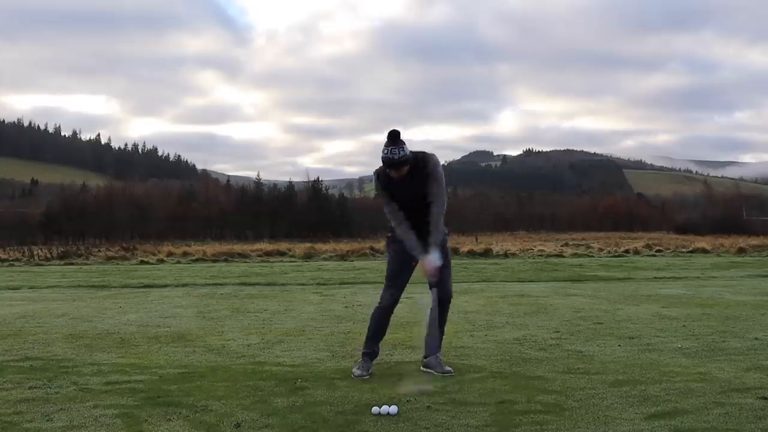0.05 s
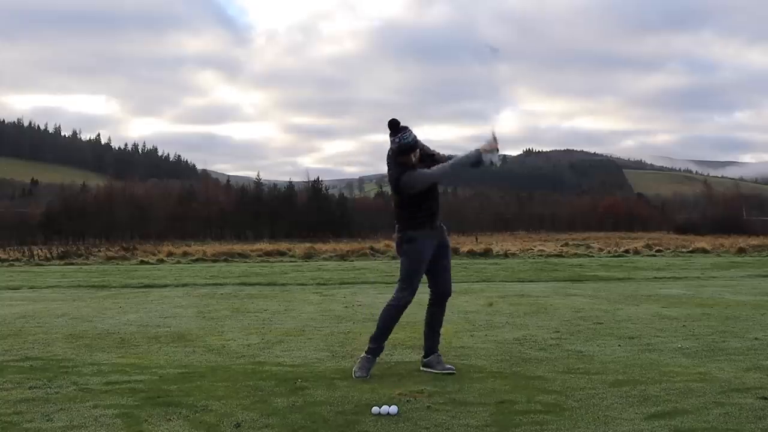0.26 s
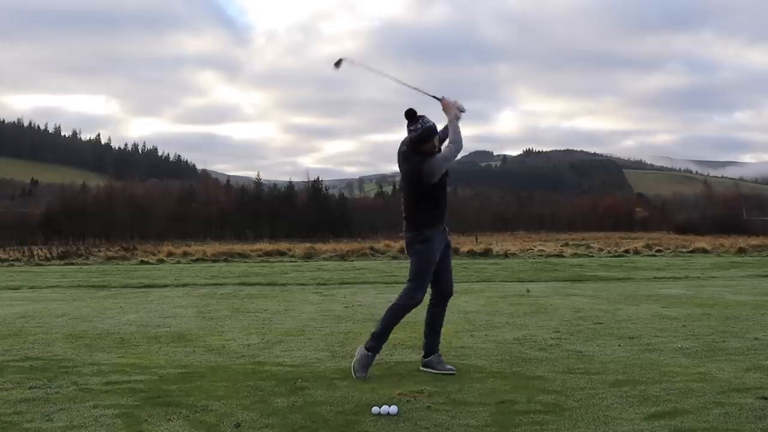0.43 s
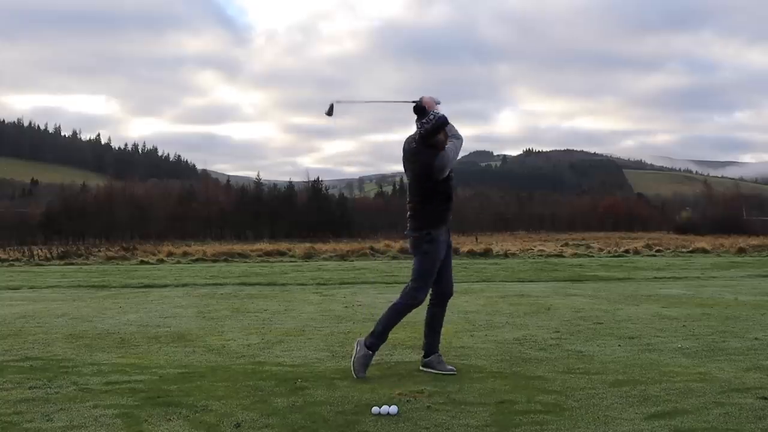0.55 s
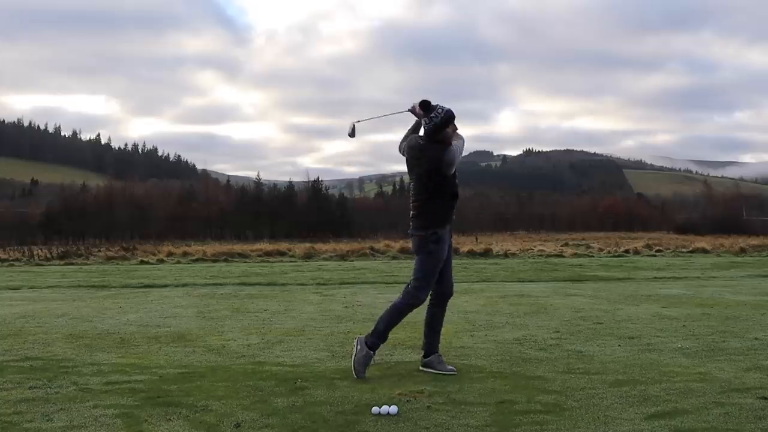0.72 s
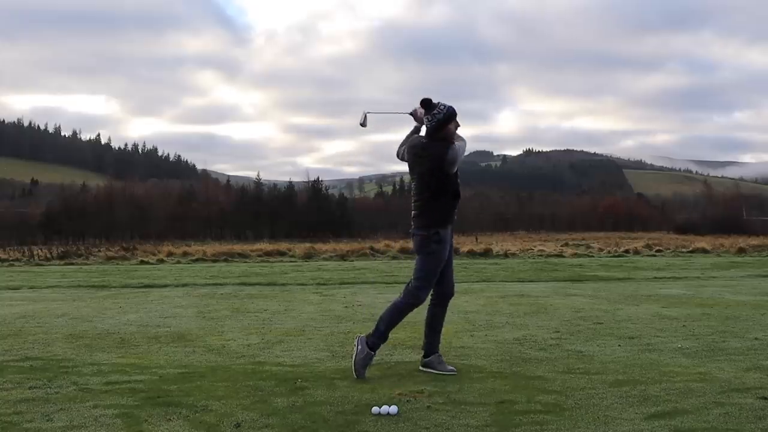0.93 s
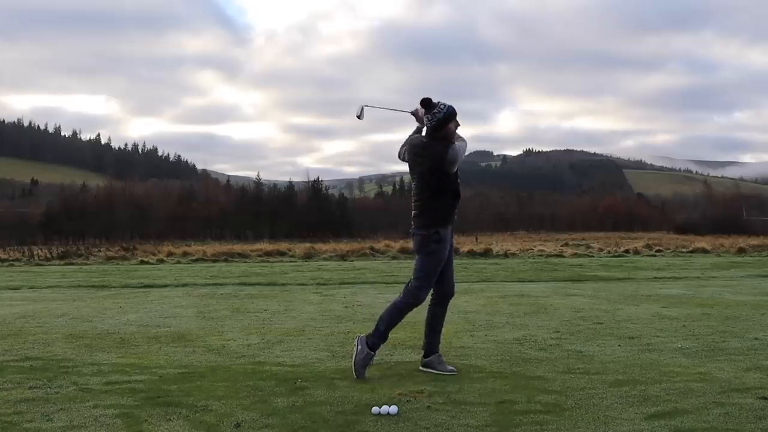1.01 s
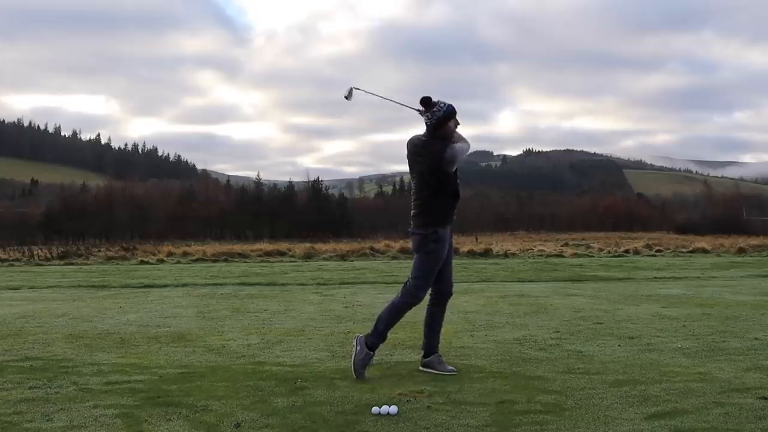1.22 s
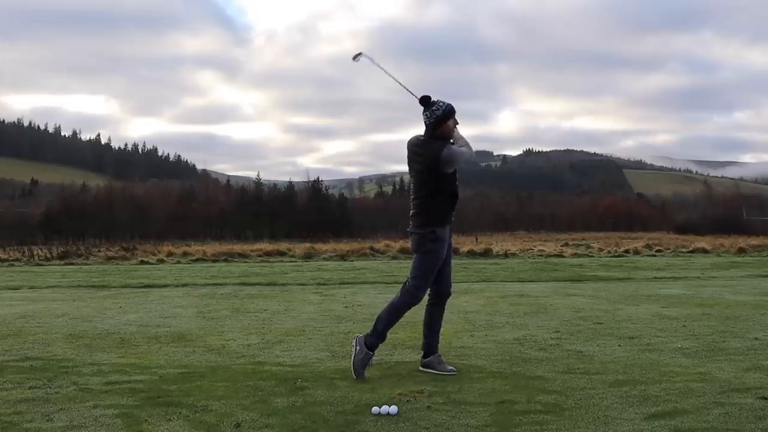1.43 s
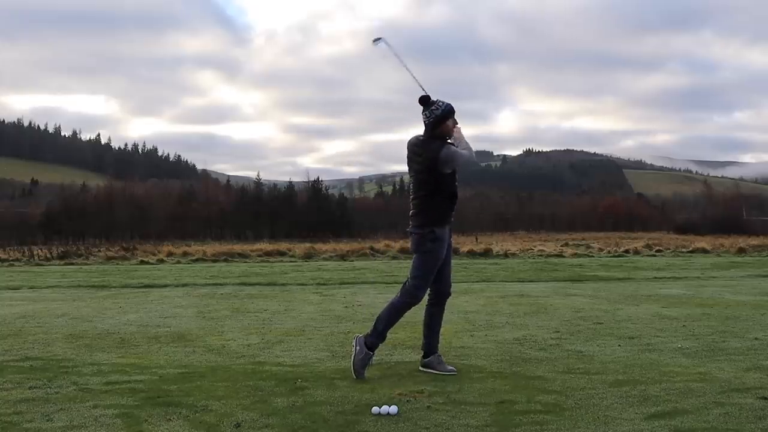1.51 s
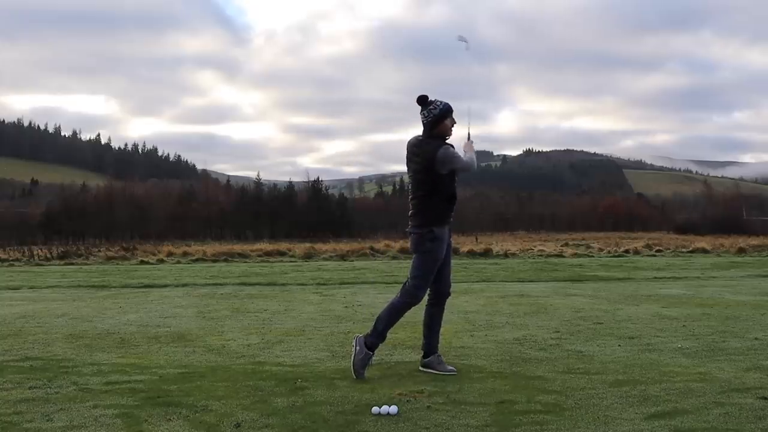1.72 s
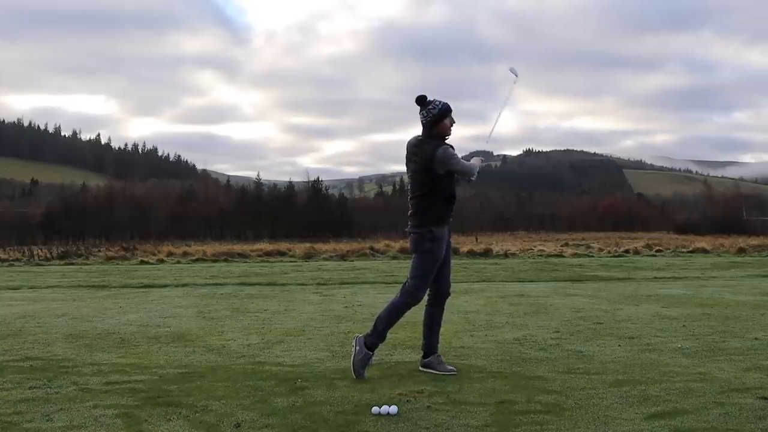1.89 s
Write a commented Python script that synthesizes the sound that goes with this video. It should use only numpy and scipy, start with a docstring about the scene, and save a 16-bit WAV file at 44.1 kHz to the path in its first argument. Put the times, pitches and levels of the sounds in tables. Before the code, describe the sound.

An iron strikes a golf ball with one sharp crack after a quick swish.

```python
"""A swish rises as an iron swings down, its shaft shedding eddies, on an open grass range.
The head strikes a golf ball with a crack and a brief ring, overloading the microphone.
It cuts on through the turf and throws up crumbs of soil; the spinning ball fizzes away.
Clothes rustle with the swing, then faintly as the club is lowered, over a far-off roar like a road."""
import sys
import numpy as np
from scipy import signal
from scipy.fft import rfft, irfft
from scipy.io import wavfile
from scipy.ndimage import uniform_filter1d

SR = 44100
rng = np.random.default_rng(int(sys.argv[2]) if len(sys.argv) > 2 else 0)


def bounce(signal):
    """Save signal as a 16-bit WAV file at the path given by the first command-line argument."""
    frames = np.transpose(np.atleast_2d(signal))
    limited = np.clip(frames, -1, 1)
    pcm = np.round(limited * 32767).astype(np.int16)
    wavfile.write(sys.argv[1], SR, pcm)


N = 85995
T = np.arange(N) / SR


def amp(db):
    """dB to gain."""
    return 10 ** (np.asarray(db) / 20)


def unit(x):
    """Scale to rms 1."""
    return x / np.sqrt(np.mean(x ** 2) + 1e-20)


def curve(rows, column=1):
    """One column of a timed table, interpolated per sample."""
    rows = np.array(rows)
    return np.interp(T, rows[:, 0], rows[:, column])


def noise(spectrum):
    """Noise of rms 1, shaped by rows of f/Hz, relative density/dB."""
    hz, db = np.transpose(spectrum)
    bins_hz = np.fft.rfftfreq(N, 1 / SR)
    gain = amp(np.interp(np.log(bins_hz + 1), np.log(hz), db))
    return unit(irfft(rfft(rng.standard_normal(N)) * gain, N))


def burst(start_s, rise_s, t60_s, hold_s=0):
    """Envelope: linear rise, hold, exponential decay."""
    age_s = T - start_s
    decay = np.exp(-np.log(1000) * np.maximum(age_s - rise_s - hold_s, 0) / t60_s)
    return np.clip(age_s / rise_s, 0, 1) * decay


def swing():
    """Shaft eddies sing a fuzzy tone, rising with speed and falling as it passes, over a rush of air."""
    # shaft air tone: t/s, f/Hz, level/dB
    swish = [(0, 108.3, -64), (.085, 151.2, -50), (.125, 218.4, -38.5), (.15, 473.7, -34.5),
             (.174, 592.4, -28.5), (.197, 363.4, -31.5), (.225, 320.7, -36.5), (.28, 270.3, -47),
             (.36, 199.9, -71.5)]
    # air around arms and club: t/s, level/dB
    rush_level = [(0, -43.5), (.05, -48), (.125, -35.5), (.18, -37.5), (.255, -39), (.31, -44), (.45, -43),
                  (.52, -53.5), (.62, -50), (.69, -71), (.8, -90.5)]
    # its spectrum: f/Hz, density/dB
    rush_spectrum = [(25, -30.5), (70, -15.5), (130, -0.5), (250, -4), (450, -4), (900, -10), (2000, -25),
                     (8000, -47.5)]
    width_hz = 135
    pole = np.exp(-np.pi * width_hz / SR)
    white = rng.standard_normal(N) + 1j * rng.standard_normal(N)
    eddies = signal.lfilter([1], np.poly([pole, pole]), white)
    phase_rad = 2 * np.pi * np.cumsum(curve(swish)) / SR
    tone = unit((eddies * np.exp(1j * phase_rad)).real)
    rush = noise(rush_spectrum) * amp(curve(rush_level))
    return tone * amp(curve(swish, column=2)) + rush


def jacket():
    """Cloth slides on cloth in tiny uneven slips; a sleeve brushes past once."""
    # rustle: t/s, level/dB
    rustle_level = [(.055, -44.5), (.122, -35), (.16, -37), (.171, -33), (.2, -37.5), (.236, -33),
                    (.28, -36), (.32, -51.5), (.76, -56.5), (.86, -61.5), (.94, -56), (1.05, -68.5),
                    (1.16, -64.5), (1.32, -57), (1.52, -55), (1.75, -55.5), (1.87, -54.5), (1.95, -60.5)]
    # coarse rustle: f/Hz, density/dB
    coarse_spectrum = [(100, -13), (600, -3), (1500, 1), (2400, 0.5), (3400, 1.5), (5500, -6), (8000, -10),
                       (11000, -19.5), (15500, -23)]
    # fine, brighter rustle: f/Hz, density/dB
    fine_spectrum = [(100, -13.5), (2400, -10), (3600, -1), (4900, 0.5), (7000, -6), (11000, -13),
                     (15500, -25)]
    # fine rustle in the mix: t/s, power share
    fine_share = [(0, .25), (.8, 0.2), (1.1, 0.6), (1.45, 0.2), (1.65, .2), (1.95, 0)]
    # airy sleeve brush: f/Hz, density/dB
    brush_spectrum = [(500, -8), (3000, -2), (8000, 5), (12000, -5), (15500, -11)]
    grain_db, grain_s = 1.5, .002
    brush_s, brush_sigma_s, brush_db = .937, .057, -63
    grain = unit(uniform_filter1d(rng.standard_normal(N), int(grain_s * SR)))
    share = curve(fine_share)
    slide = np.sqrt(1 - share) * noise(coarse_spectrum) + np.sqrt(share) * noise(fine_spectrum)
    rustle = unit(slide * amp(grain_db * grain)) * amp(curve(rustle_level))
    brush_gain = amp(brush_db) * np.exp(-.5 * ((T - brush_s) / brush_sigma_s) ** 2)
    return rustle + brush_gain * noise(brush_spectrum)


def roar():
    """Far-off, nearly steady noise like a road."""
    # roar: f/Hz, density/dB
    spectrum = [(20, -27), (50, -19), (78, -15.5), (105, -4), (170, -10), (300, -6), (520, -8), (720, -1),
                (930, 2.5), (1150, -7.5), (1500, -18), (2400, -27), (6000, -22.5), (16000, -45.5)]
    # slow drift: t/s, level/dB
    roar_level = [(0, -53.5), (.7, -49.5), (1.1, -53.5), (1.5, -52.5), (1.95, -53.5)]
    return noise(spectrum) * amp(curve(roar_level))


def snaps():
    """Grass, flying crumbs of soil and creasing cloth give tiny noise bursts."""
    # snaps: t/s, level/dB
    events = [(0.1735, -15.5), (.222, -23.5), (.2343, -20), (0.236, -26), (.2435, -33), (.759, -42.5),
              (0.841, -44), (.901, -42), (1.493, -44), (1.644, -46)]
    # their spectrum: f/Hz, density/dB
    spectrum = [(200, -10.5), (1500, -1.5), (4500, 8), (8000, -10.5), (16000, -14.5)]
    envelope = sum(amp(db) * burst(at_s, rise_s=.0001, t60_s=.0056) for at_s, db in events)
    return envelope * noise(spectrum)


def strike():
    """Face meets ball: a violent crack and a brief hard ring, boosted for the first milliseconds."""
    # head and ball modes: f/Hz, level before boost/dB, t60/s
    modes = [(1033, -21.5, .03), (1450, -15, 0.01), (1598, -10, 0.035), (1875, -12, .026),
             (2120, -7.5, .023), (2404, -14, 0.029), (3197, -15, 0.036), (3642, -4, 0.021),
             (4275, -12, 0.026), (4443, -14, 0.019), (4745, -15, 0.042), (5373, -12, .024),
             (5687, -11, .022), (6560, -21.5, .018)]
    # impact crack: f/Hz, density/dB
    crack_spectrum = [(40, -10.5), (150, -4.5), (500, -2.5), (850, -7.5), (1800, -3), (2900, 0),
                      (4500, 1.5), (8000, -7), (13500, -14.5), (16000, -22)]
    strike_s, contact_s = .1815, .0009
    ring = np.zeros(N)
    for k, (hz, db, t60_s) in enumerate(modes):
        tone = (-1) ** k * np.sin(2 * np.pi * hz * (T - strike_s))
        ring += amp(db) * burst(strike_s, contact_s, t60_s) * tone
    crack = amp(-5.5) * burst(strike_s, contact_s, t60_s=.017) * noise(crack_spectrum)
    boost = 1 + amp(4.5) * burst(strike_s, contact_s, t60_s=.005, hold_s=.0045)
    return (ring + crack) * boost


def turf():
    """The head cuts through turf: one short, dull noise burst."""
    # cut: f/Hz, density/dB
    spectrum = [(30, -11), (150, -6), (400, 0.5), (900, -0.5), (2000, -5), (4500, -5), (8000, -14.5),
                (16000, -32)]
    return amp(-15) * burst(start_s=.186, rise_s=.001, t60_s=.012, hold_s=.0043) * noise(spectrum)


def thuds():
    """Dead blows on the soil: Gaussian pulses about one cycle long."""
    # blows: t/s, f/Hz, level/dB
    blows = [(.187, 500, -18.5), (.193, 283, -12), (0.2489, 410, -17), (0.254, 130, -31),
             (0.458, 167, -34.5), (.595, 209.4, -40), (1.679, 1230, -40), (1.726, 653, -38.5)]
    sigma_cycles = .48
    pulses = np.zeros(N)
    for at_s, hz, db in blows:
        cycles = (T - at_s) * hz
        pulses -= amp(db) * np.exp(-.5 * (cycles / sigma_cycles) ** 2) * np.cos(2 * np.pi * cycles)
    return pulses


def flight():
    """The spinning ball's fizz swells and recedes."""
    # fizz: f/Hz, density/dB
    spectrum = [(100, -12.5), (700, -1.5), (1600, -4), (2800, -1), (4800, -2), (7000, -6.5), (10000, -14),
                (15500, -24.5)]
    # swell and fade: t/s, level/dB
    fizz_level = [(.18, -70), (.24, -56), (.31, -40), (.38, -37.5), (.5, -37.5), (.57, -41.5), (.66, -43.5),
                  (.74, -56.5), (.9, -78)]
    return noise(spectrum) * amp(curve(fizz_level))


def scene():
    """All sources in open air; mono, no reverberation."""
    return (swing() + jacket() + roar() + snaps() + strike() + turf() + thuds() + flight())[None]


def record(dry):
    """The strike clips at full scale; a low-pass follows."""
    cutoff_hz = 15900
    lowpass = signal.firwin(511, cutoff_hz, window=("kaiser", 9), fs=SR)
    return signal.oaconvolve(np.clip(dry, -1, 1), lowpass[None], "same")


dry = scene()
out = record(dry)
bounce(out)
```